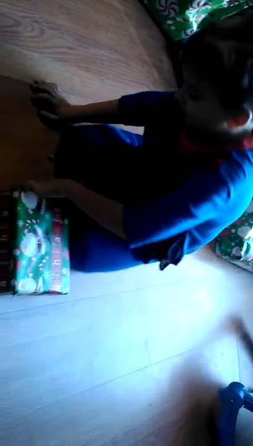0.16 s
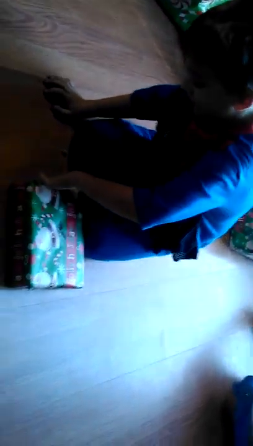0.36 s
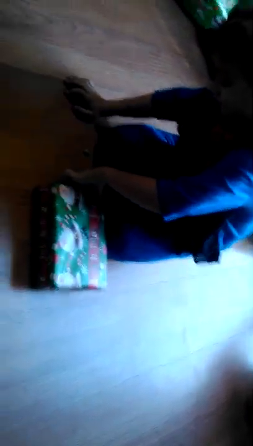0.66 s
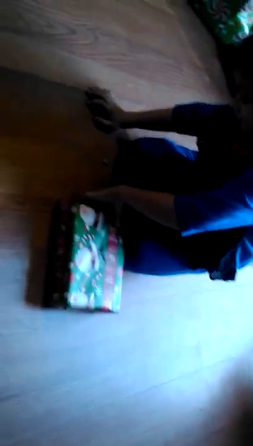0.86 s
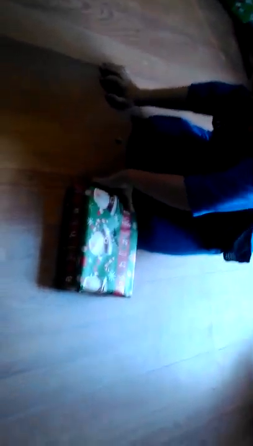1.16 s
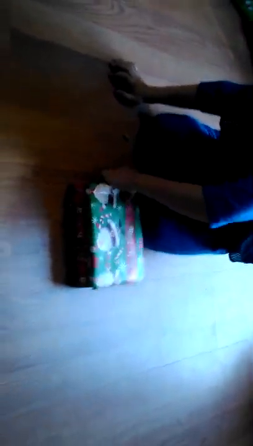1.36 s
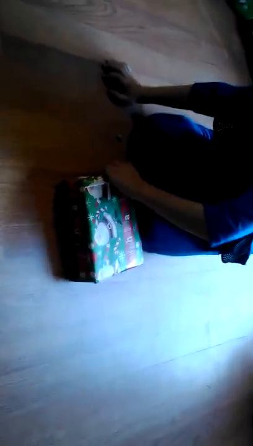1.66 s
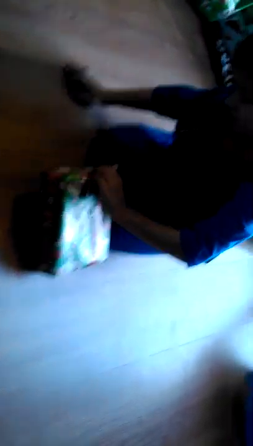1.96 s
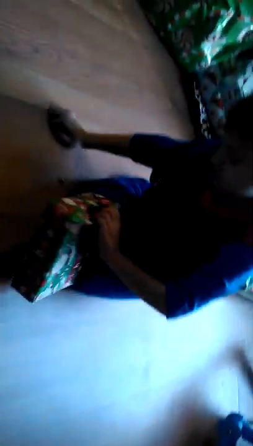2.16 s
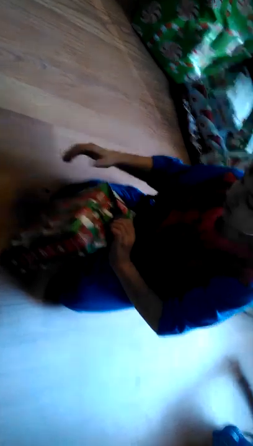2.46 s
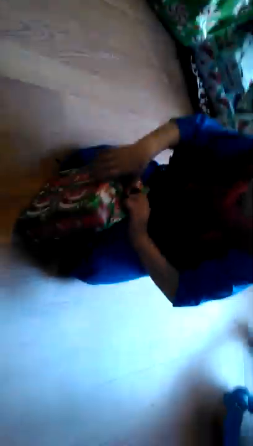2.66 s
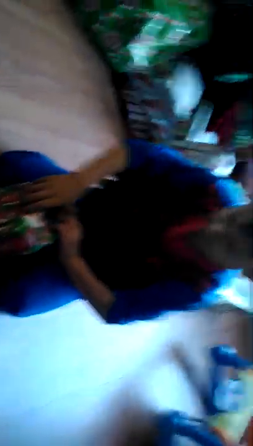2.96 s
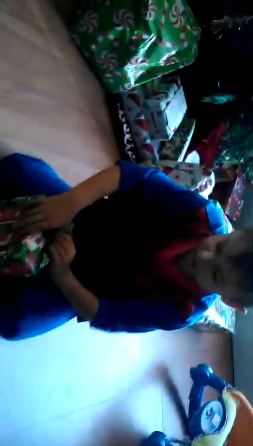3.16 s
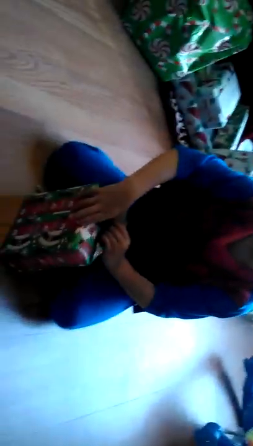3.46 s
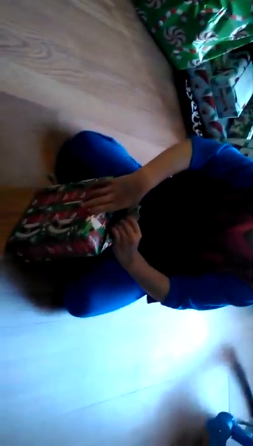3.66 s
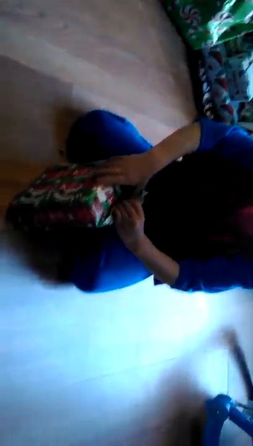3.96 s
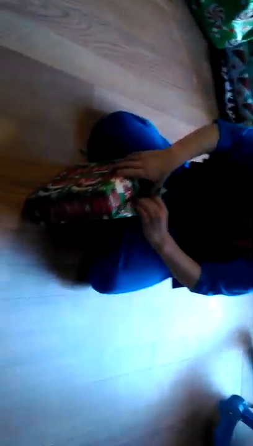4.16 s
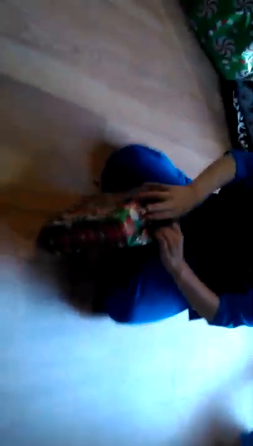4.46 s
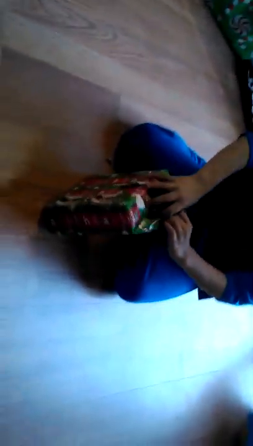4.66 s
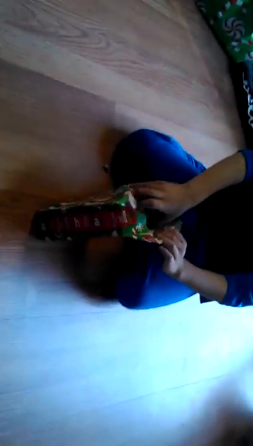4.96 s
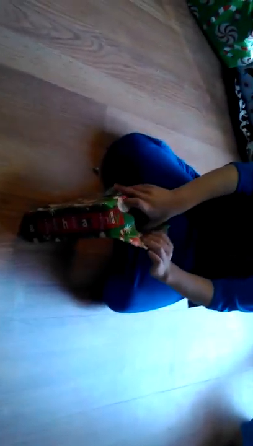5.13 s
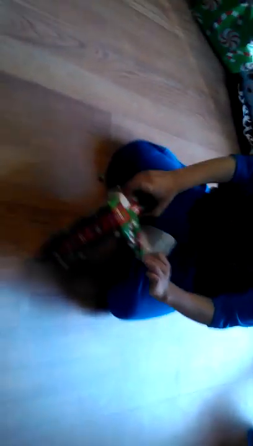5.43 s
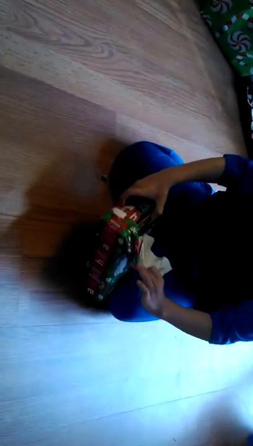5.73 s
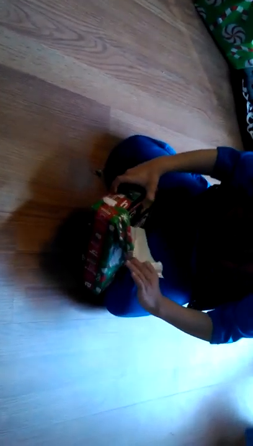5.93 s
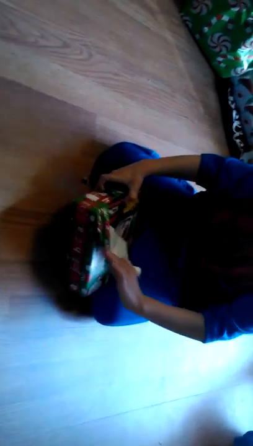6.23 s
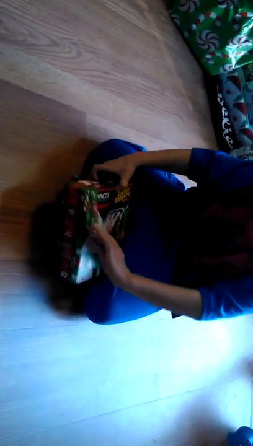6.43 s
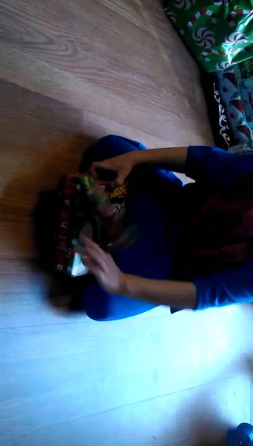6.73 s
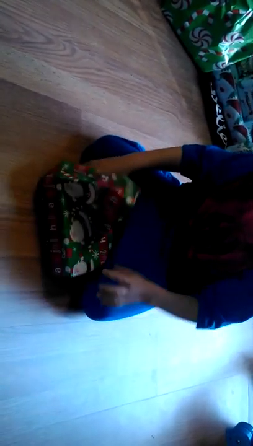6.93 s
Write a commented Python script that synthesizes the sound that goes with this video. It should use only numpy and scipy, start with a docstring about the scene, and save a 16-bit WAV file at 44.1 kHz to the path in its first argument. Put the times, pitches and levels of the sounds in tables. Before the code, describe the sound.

Close, dry-bright gift wrap handled over a box in a small hard-floored room. A quiet start, then sharp loud paper snaps in the first two seconds, sparser crinkles, and a hard finger bump on the phone near three seconds. Light picking follows, then a ripping tear, a pause, a second thinner rip with a loud crack, and hollow box knocks at the end.

```python
"""Gift wrap on a cardboard box

Hands pick at, rip and crumple thin gift wrap round a box on a hard floor, a metre from a phone.
Creases snap singly as short tinted noise bursts; tearing is a dense hail of tiny noisy grains with crackle.
Blows ring modes of the box, a finger taps and slides on the phone case (modes and slip bursts).
A decaying noise tail answers paper and box; filtered room tone, mains hum and a brief whistle lie below."""
import sys
import numpy as np
from scipy import signal
from scipy.fft import rfft, irfft
from scipy.io import wavfile
from scipy.ndimage import uniform_filter1d

SR = 44100
rng = np.random.default_rng(int(sys.argv[2]) if len(sys.argv) > 2 else 0)


def magnitude_from_level(level_db):
    """Linear magnitude for a level in decibels (20 dB per decade)."""
    exponent = np.asarray(level_db, float) / 20
    return 10 ** exponent


def store_wav(level_fs):
    """Save 16-bit WAV to argv[1]."""
    pcm = np.round(np.clip(np.atleast_2d(level_fs), -1, 1) * 32767)
    wavfile.write(sys.argv[1], SR, pcm.T.astype(np.int16))


N = 312669
T = np.arange(N) / SR
SPLIT_HZ, EDGE_HZ = 3000, 8500  # bass | middle | top of the paper
RELEASE_DB_PER_S = 339  # fall after a tug or rip


def butter(x, hz, kind, order=4):
    """Butterworth filter."""
    return signal.sosfilt(signal.butter(order, hz, kind, fs=SR, output="sos"), x)


def response(points, size=1024):
    """Minimum-phase impulse response with the colour of (f/Hz, level/dB) points."""
    hz, db = np.transpose(points)
    f = np.maximum(np.fft.rfftfreq(size, 1 / SR), 1)
    log_gain = np.interp(np.log(f), np.log(hz), db) * np.log(10) / 20
    # folding the cepstrum makes the response causal
    cepstrum = irfft(log_gain)
    cepstrum[1:size // 2] *= 2
    cepstrum[size // 2 + 1:] = 0
    return irfft(np.exp(rfft(cepstrum)))


def through(x, h):
    """Convolution, cut to the length of x."""
    return signal.oaconvolve(x, h)[:len(x)]


def unit(x):
    """Scale to rms 1."""
    return x / np.sqrt(np.mean(x ** 2))


def peak(x):
    """Scale to peak 1."""
    return x / np.max(np.abs(x))


def add(out, s, x):
    """Mix x into out from time s."""
    i = int(s * SR)
    out[i:i + len(x)] += x[:len(out) - i]


def walk(rate_hz):
    """Random levels held 1 / rate_hz and slewed twice; rms 1."""
    hold = int(SR / rate_hz)
    steps = np.repeat(rng.standard_normal(N // hold + 1), hold)
    slewed = uniform_filter1d(uniform_filter1d(steps, hold), hold)
    return unit(slewed[:N])


def room_tone(level_db=-58.5, flicker_db=1.0):
    """Quiet air of the house, as filtered noise of wavering level, with mains hum."""
    # air spectrum: f/Hz, relative level/dB per Hz
    air_colour = [(15, -5), (25, -9), (49, -9.5), (227, -6.5), (396, -12), (879, -17.5), (1270, -21.5),
                  (2980, -25), (5210, -27), (6440, -19.5), (7760, -31.5), (11900, -32), (14300, -34)]
    # mains hum: f/Hz, rms level/dB
    hum_lines = [(60, -71.5), (120, -70)]
    air = unit(through(rng.standard_normal(N), response(air_colour, size=4096)))
    hum = sum(magnitude_from_level(db) * np.sqrt(2) * np.sin(2 * np.pi * hz * T) for hz, db in hum_lines)
    return magnitude_from_level(level_db + flicker_db * walk(4.32)) * air + hum


def whistle(centre_hz=6480, width_hz=150, level_db=-57.5):
    """A narrow hiss near the microphone port resonance that fades in and out."""
    start_s, end_s, fade_s = 0.215, 0.6, 0.04
    edges_hz = [centre_hz - width_hz / 2, centre_hz + width_hz / 2]
    shape = np.clip(np.minimum(T - start_s, end_s - T) / fade_s, 0, 1)
    return magnitude_from_level(level_db) * shape * unit(butter(rng.standard_normal(N), edges_hz, "band", order=1))


def room(x):
    """Floor and hands scatter at once; the walls come in after a gap, the first echoes strongest."""
    # reverberation: f/Hz, t60/s
    reverb_times = [(200, 0.3), (700, 0.36), (2000, 0.17), (6000, 0.16), (12000, 0.2)]
    room_db, nearby_db = -7.5, -5.5  # whole tail re input; scatter ahead of the walls
    gap_s, rise_s = 0.0102, 0.0023
    early_db, early_s = 12, 0.012  # boost that dies away, in dB, with this time constant
    t = np.arange(SR // 2) / SR
    hz, t60_s = np.transpose(reverb_times)
    tail = 0
    for centre in 90 * 2 ** np.arange(0, 7.6, 0.5):
        edges_hz = [centre / 2 ** 0.21, centre * 2 ** 0.25]
        band = butter(rng.standard_normal(len(t)), edges_hz, "band", order=2)
        band_t60_s = np.interp(np.log(centre), np.log(hz), t60_s)
        tail = tail + band * np.exp(-np.log(1000) * t / band_t60_s)
    tail *= np.clip((t - gap_s) / rise_s, magnitude_from_level(nearby_db), 1)
    tail *= magnitude_from_level(early_db * np.exp(-t / early_s))
    return magnitude_from_level(room_db) * through(x, tail / np.sqrt(np.sum(tail ** 2)))


def blow(modes, gain_db, contact_ms):
    """A half-sine push rings modes; softer contact lasts longer and sounds duller; peak 1."""
    t = np.arange(SR // 4) / SR
    hz, db, t60_s = modes[:, :1], modes[:, 1], modes[:, 2:]
    rings = np.sin(2 * np.pi * hz * t) * np.exp(-np.log(1000) * t / t60_s)
    push = np.sin(np.pi * np.clip(t[:400] * 1000 / max(contact_ms, 0.1), 0, 1))
    return peak(through(magnitude_from_level(db + gain_db) @ rings, push))


def bursts(colour, count, rise_ms=0.24, fall_ms=0.7):
    """Short noisy pushes with exponential rise and fall."""
    t_ms = np.arange(700) / SR * 1000
    shape = (1 - np.exp(-t_ms / rise_ms)) * np.exp(-t_ms / fall_ms)
    return [through(shape * noise, colour) for noise in rng.standard_normal((count, len(t_ms)))]


def tinted(burst, low_db, top_db):
    """A burst with its bass and top set against its middle, by peak."""
    high, low = butter(burst, SPLIT_HZ, "high"), butter(burst, [170.0, SPLIT_HZ], "band", order=2)
    body, top = butter(high, EDGE_HZ, "low"), butter(high, EDGE_HZ, "high")
    return peak(body) + magnitude_from_level(low_db) * peak(low) + magnitude_from_level(top_db) * peak(top)


def case_taps():
    """A finger taps the phone: each blow rings the modes of its case."""
    # taps: t/s, peak level/dB, contact/ms
    tap_times = [(2.648, -21, 0.7), (3.0208, -7.5, 0.09), (3.052, -14, 0.89), (3.494, -39, .4),
                 (3.506, -37, 0.35), (6.8365, -29, 0.15), (6.8445, -25.5, 0.16)]
    # case modes: f/Hz, relative level/dB, t60/s
    case_modes = np.array([(91.4, 6, 0.077), (343, -5, 0.21), (580, 23.5, 0.017), (980, 28, 0.0036),
                           (1370, -4, 0.0056)])
    out = np.zeros(N)
    for s, db, contact_ms in tap_times:
        add(out, s, magnitude_from_level(db) * blow(case_modes, 0, contact_ms))
    return out


def finger_slides(colour):
    """A finger sticks and slips on the phone case; one loud sharp slip sounds during the second slide."""
    # slides: start t/s, end t/s, slip level/dB (peak of the middle, before scatter and ringing)
    slide_times = [(2.987, 3.035, -28), (3.04, 3.055, -27)]
    gap_s, scatter_db, low_db, top_db = 0.0035, 2.5, -10.5, -17
    ring_hz, ring_db = (5900, 7040), -4  # slips ring the microphone port
    sharp_s, sharp_db = 3.0512, -5.5
    out = np.zeros(N)
    for start, end, db in slide_times:
        times = np.arange(start, end, gap_s)
        chance = rng.standard_normal((len(times), 2))
        for s, (late, size), burst in zip(times, chance, bursts(colour, len(times), fall_ms=2.1)):
            slip = magnitude_from_level(db + scatter_db * size) * tinted(burst, low_db, top_db)
            slip = slip + magnitude_from_level(ring_db) * butter(slip, ring_hz, "band", order=1)
            add(out, s + late * gap_s / 8, slip)
    add(out, sharp_s, magnitude_from_level(sharp_db) * tinted(bursts(colour, count=1)[0], low_db, top_db))
    return out


def knocks(deep_hz=400, scatter_db=2.0):
    """Each blow lands elsewhere on the box and rings its panels in another mix."""
    # blows: t/s, peak level/dB, contact/ms, gain of the deep panel modes/dB
    box_blows = [(0.0971, -28.5, 0.15, -7), (1.355, -23.5, 0.73, 6), (2.431, -33.5, .4, 3),
                 (4.928, -32.5, 0.49, 10), (5.065, -27, 1, -32), (5.076, -34, 1, -29),
                 (5.944, -28, 0.23, -30), (6.358, -23, 0.46, 17), (6.64, -29.5, 0.3, -5),
                 (6.698, -26.5, 0.39, 2), (6.9589, -17, 0.36, -8), (6.9634, -11, 0.44, 7),
                 (6.97, -23, 1, 10), (6.994, -25, 1, 8)]
    # panel modes: f/Hz, relative level/dB, t60/s
    box_modes = np.array([(93, -1, 0.092), (161, 7, 0.073), (233, 13.5, 0.097), (234, -7, .1),
                          (334, 21, 0.038), (504, -14, 0.015), (864, 22.5, 0.014), (1067, -2, 0.19),
                          (1160, -30, 0.025), (2110, -20, .02)])
    out = np.zeros(N)
    deep = box_modes[:, 0] < deep_hz
    chances = rng.standard_normal((len(box_blows), len(box_modes)))
    for (s, db, contact_ms, deep_db), chance in zip(box_blows, chances):
        gain_db = deep * deep_db + scatter_db * chance
        add(out, s, magnitude_from_level(db) * blow(box_modes, gain_db, contact_ms))
    return out


def tug(start, hold, db):
    """Level of one tug: quick attack, slow sag while held, steady release."""
    attack_s, sag_db_per_s = 0.0099, 23.5
    t = T - start
    fall_db = sag_db_per_s * np.clip(t, 0, hold) + RELEASE_DB_PER_S * np.maximum(t - hold, 0)
    return np.clip(t / attack_s, 0, 1) * magnitude_from_level(db - fall_db)


def handling(hiss_low_db=-13):
    """Gains of middle, bass and top of the paper noise: hiss, tugs and rips add in power."""
    # faint hiss between tugs: t/s, middle level/dB, top re middle/dB
    hiss_levels = [(0, -71, -18), (.18, -66, -15), (.27, -61.5, -14), (.45, -64, -12), (.67, -59, 0.5),
                   (.95, -61, -9), (1.8, -53, -18), (2.6, -61, -28), (2.95, -58.5, -7), (3.4, -73, -22.5),
                   (3.7, -62, -9), (5.1, -57, -18), (5.85, -61, -24), (7.09, -59, -2)]
    # tugs: start t/s, hold/s, middle level/dB, bass re middle/dB, top re middle/dB
    tug_list = [(.088, 0.05, -48.5, -2, -12), (0.947, 0.034, -45.5, -9.5, -11),
                (1.002, 0.18, -35, -12, -19), (1.095, 0.083, -38.5, -17, -23),
                (1.337, 0.033, -20, -9.5, -21), (1.395, 0.096, -31.5, -11.5, -17),
                (1.529, 0.053, -40.5, -4, -15), (1.642, 0.017, -44, -3, -12), (1.728, 0.072, -42.5, -9, -8),
                (1.841, 0.081, -42.5, -2, -9), (1.949, 0.086, -44.5, -6.5, -17),
                (2.127, 0.021, -47.5, -3.5, -10), (2.216, 0.026, -40.5, -8, -9),
                (2.306, 0.052, -45.5, -6.5, -5.5), (2.392, 0.064, -40.5, -8.5, -8),
                (2.646, 0.068, -50, -4, -12), (2.74, 0.085, -53, -6.5, -10), (2.839, 0.016, -45, -8, -12),
                (3.104, 0.014, -58.5, 5, -4), (3.151, 0.055, -48.5, -4, -12),
                (3.765, 0.024, -49.5, -4, -13), (3.858, 0.0094, -38.5, -8.5, -15),
                (4.014, 0.0093, -43, -7.5, -10), (4.166, 0.031, -41, -4.5, -15),
                (4.266, 0.018, -53.5, 3, -3), (4.418, 0.016, -43, -3.5, -7), (4.474, 0.021, -58.5, 2, -16),
                (4.615, .11, -42.5, -8.5, -10), (4.826, 0.059, -40.5, -6.5, -12),
                (4.925, 0.019, -44, -3.5, -11), (5.017, 0.056, -45.5, -6, -11),
                (5.064, 0.027, -42.5, -1.5, -4), (5.127, .06, -56.5, -4, -11), (5.701, 0.091, -52, -11, -7),
                (5.918, 0.088, -32, -8, -8), (6.634, 0.021, -44.5, -6.5, -2),
                (6.679, 0.077, -35, -7.5, -16), (6.831, 0.016, -57, 5, -2), (6.886, 0.066, -51, -0.5, -5),
                (6.929, 0.076, -42, -0.5, -9)]
    # two long rips, each: t/s, middle level/dB, bass re middle/dB, top re middle/dB
    rip_list = [
        [(5.222, -45, -3, -17), (5.3, -37, -4.5, -8), (5.355, -33.5, -6, -21), (5.395, -21.5, -12, -9.5),
         (5.45, -19.5, -13, -3), (5.488, -23, -13, -3.5), (5.505, -25.5, -19, -10), (5.606, -38.5, -13.5, -15),
         (5.66, -48, -10.5, -8)],
        [(6.055, -44, -7, -8), (6.09, -41, -8, 0), (6.17, -34.5, -11.5, -2.5), (6.33, -34, -12, -3.5),
         (6.36, -27, -10, 2.5), (6.4, -33, -10, -10), (6.47, -37.5, -11.5, -5), (6.52, -58, -14, -14)],
    ]
    s, db, top_db = np.transpose(hiss_levels)
    db = np.interp(T, s, db)
    power = magnitude_from_level(np.array([db, db + hiss_low_db, db + np.interp(T, s, top_db)])) ** 2
    for start, hold, db, low_db, top_db in tug_list:
        power += np.outer(magnitude_from_level(np.array([0, low_db, top_db])), tug(start, hold, db)) ** 2
    for rip in rip_list:
        s, db, low_db, top_db = np.transpose(rip)
        fade_db = RELEASE_DB_PER_S * np.maximum(T - s[-1], 0)
        for i, share_db in enumerate((0, low_db, top_db)):
            level_db = np.interp(T, s, db + share_db) - fade_db
            power[i] += ((T >= s[0]) * magnitude_from_level(level_db)) ** 2
    return np.sqrt(power)


def crackle(colour, gain, rate_hz=22, width_oct=0.33):
    """Small creases pop at random, each in its own part of the spectrum; a fast rip drowns them."""
    # band centres: f/Hz
    centres_hz = (1200, 2400, 4200, 5800, 7800, 11000)
    crackle_db, most_db, ceiling_db = 15.5, 4.5, -33  # ceiling: on the handling gain
    size_db = np.minimum(3 * rng.exponential(size=N), most_db)
    pops = (rng.random((len(centres_hz), N)) < rate_hz / SR) * magnitude_from_level(size_db)
    bands = [butter(p, [hz * 2 ** -width_oct, hz * 2 ** width_oct], "band", order=2)
             for hz, p in zip(centres_hz, pops)]
    return magnitude_from_level(crackle_db) * np.minimum(gain, magnitude_from_level(ceiling_db)) * through(sum(bands), peak(colour))


def rustle(colour, gains, rate_hz=1200.0, grain_ms=1.0, scatter_db=2.0, most_db=15.0, lowest_hz=151.4):
    """Fibres let go in short noisy grains, a few much larger; the long strip hums while pulled taut."""
    # taut strip: t/s, gain/dB
    strip_gain = [(6.1, 0), (6.2, 8), (6.32, 8), (6.4, 0)]
    body_gain, low_gain, top_gain = gains
    hit = rng.random(N) < rate_hz / SR
    size = hit * magnitude_from_level(np.minimum(scatter_db * rng.exponential(size=N), most_db))
    grain = np.exp(-np.arange(300) / (grain_ms * SR / 1000))  # in power
    envelope = np.sqrt(np.abs(through(size ** 2, grain)))
    hail = through(envelope * rng.standard_normal(N), colour)
    low, high = butter(hail, [lowest_hz, SPLIT_HZ], "band"), butter(hail, SPLIT_HZ, "high")
    body, top = unit(butter(high, EDGE_HZ, "low")), butter(high, EDGE_HZ, "high")
    boost = magnitude_from_level(np.interp(T, *np.transpose(strip_gain))) - 1
    strip = boost * butter(body, (4250, 5050), "band", order=1)
    return body_gain * (body + strip) + low_gain * unit(low) + top_gain * unit(top)


def snaps(colour, to_walls_db=5):
    """A crease buckles in a noisy burst; each snap has its own level, bass share and top share."""
    # loudest creases: t/s, middle peak level/dB, bass re middle/dB, top re middle/dB
    crease_list = [(0.0735, -42, -22, -10), (0.9586, -27, -9, -21), (1.0169, -19, -15, -3),
                   (1.0397, -8.5, -12, -5.5), (1.0538, -10, -12, -33), (1.1064, -15, -5.5, -16),
                   (1.1205, -8.5, -23, -11), (1.3254, -3, -21.5, -13), (1.3418, -13, -17, -21),
                   (1.3471, -3.5, -17, -20), (1.3493, -1.5, -10, -11), (1.3563, -14, -15, -20),
                   (1.433, -15, -16, -18), (1.4695, -24, -13, -5), (1.5487, -21, -6.5, -26),
                   (1.562, -16.5, -11, -16), (1.649, -23.5, -19, -28), (1.731, -28, -2.5, -5),
                   (1.755, -22, -26, -37), (1.7769, -9.5, -13, -35), (1.8433, -26, 0, -21),
                   (1.8813, -25, 0, -7), (1.9352, -28.5, 5, -28), (1.9904, -40, -23, -30),
                   (2.1335, -25, -21, -21), (2.2361, -26, 0, -12), (2.3114, -24.5, -33, -7),
                   (2.4132, -13, -10, -6), (2.5248, -32, -4, -15), (2.674, -21.5, -8, -17),
                   (2.837, -22.5, -13, -17), (3.1154, -28.5, -18, -26), (3.1571, -33.5, -14, -3),
                   (3.1928, -29, -16, -1), (3.2806, -40, -11, 2), (3.756, -30.5, -12, -24),
                   (3.7732, -30.5, -24, -5), (3.8552, -21, -35, -14), (4.0103, -22, -32, -20),
                   (4.026, -24.5, -25, -17), (4.1693, -25, -18, -8), (4.1876, -24.5, -32, -26),
                   (4.216, -39, -8, -17), (4.2775, -27.5, -19, -16), (4.4241, -25, -12, -11),
                   (4.4577, -26, -33, -28), (4.5078, -34, -9, -27), (4.613, -23, -17, -8),
                   (4.677, -24.5, -23, -26), (4.838, -36, -24, -21), (4.8528, -19, -17, -22),
                   (4.929, -28, -27, -4), (5.026, -32, -4, -14), (5.035, -28.5, 0.5, -6),
                   (5.0721, -15, -17, -22), (5.124, -27, -28, -30), (5.176, -36, -29, -11),
                   (5.224, -25.5, -12, -10), (5.2416, -23.5, -26, -5), (5.278, -18.5, -30, -22),
                   (5.3148, -17.5, 0.5, -22), (5.3619, -13, -7, -23), (5.7064, -26.5, -9, -14),
                   (5.9208, -34, -26, -16), (5.9341, -23.5, -0.5, -3), (6.068, -30, -9, -4),
                   (6.079, -18.5, -16, -7), (6.357, -0.5, -17, -13), (6.3624, -11, -16, -9),
                   (6.535, -31.5, -4.5, 0), (6.599, -37.5, -9, -3), (6.648, -26, -17, -7),
                   (6.6934, -26.5, -18, 1), (6.7266, -15, -25, -27), (6.932, -27, -19, -13),
                   (6.9602, -22, 7.5, -15), (7.01, -33, 2, -21)]
    direct, to_walls = np.zeros(N), np.zeros(N)
    for (s, db, low_db, top_db), burst in zip(crease_list, bursts(colour, len(crease_list))):
        snap = magnitude_from_level(db) * tinted(burst, low_db, top_db)
        add(direct, s, snap)
        # walls collect every direction: even colour, energy tied to the direct snap
        even = tinted(colour, low_db, top_db)
        same_energy = even * np.sqrt(np.sum(snap ** 2) / np.sum(even ** 2))
        add(to_walls, s, magnitude_from_level(to_walls_db) * same_energy)
    return direct, to_walls


def scene(box_room_db=-2.5):
    """One microphone hears paper and box, direct and off the walls, and its own case without the room."""
    # paper as coloured by the microphone port, which rings near 6.5 kHz: f/Hz, relative level/dB
    paper_colour = [(35, -90), (60, 8), (172, -11.5), (226, -10.5), (260, -8.5), (366, -11), (529, -16.5),
                    (836, -12), (1260, -17), (2090, -17.5), (3880, -16.5), (5600, -7), (6600, -1),
                    (7300, -7.5), (8070, -16.5), (11400, -17.5), (14300, -23.5)]
    colour = response(paper_colour)
    creases, creases_to_walls = snaps(colour)
    gains = handling()
    tearing = rustle(colour, gains) + crackle(colour, gains[0])
    box = -knocks()  # struck panels move away from the phone first
    walls = room(tearing + creases_to_walls + magnitude_from_level(box_room_db) * box)
    case = case_taps() + finger_slides(colour)
    near = tearing + creases + box + case + walls + whistle()
    return np.tile(butter(near, 65.0, "high", order=3) + room_tone(), (2, 1))


def treble_apart(mid, apart_db=-3.5, patch=(8, 16)):
    """Patches of treble, about 1.4 kHz by 45 ms, flicker apart between left and right."""
    # how often left and right part: f/Hz, share of the time/0-1
    apart_share = [(3500, 0.05), (5000, 0.1), (7000, 0.5), (10000, 0.91), (14000, .5)]
    f, _, z = signal.stft(mid, SR, nperseg=256)
    hz, share = np.transpose(apart_share)
    chance = rng.random((z.shape[0] // patch[0] + 1, z.shape[1] // patch[1] + 1))
    chance = np.kron(chance, np.ones(patch))[:z.shape[0], :z.shape[1]]
    apart = chance < np.interp(f, hz, share, left=0)[:, None]
    random_phase = np.exp(2j * np.pi * rng.random(z.shape))
    return magnitude_from_level(apart_db) * signal.istft(z * apart * random_phase, SR, nperseg=256)[1][:N]


def low_pass(x):
    """Removes everything above the highest recorded frequency."""
    return signal.sosfilt(signal.butter(12, 15550, fs=SR, output="sos"), x)


def record(dry, ceiling=0.75, top_hz=14200, offset=-0.0013):
    """Rounds the loudest peaks, cuts the top, parts patches of treble and adds a constant offset."""
    rounded = ceiling * np.tanh(dry[0] / ceiling)
    mid = signal.sosfilt(signal.ellip(8, 0.2, 40, top_hz, fs=SR, output="sos"), rounded)
    side = treble_apart(mid)
    mix = mid + offset + side * np.array([[1], [-1]])
    return low_pass(mix)


dry = scene()
out = record(dry)
store_wav(out)
```